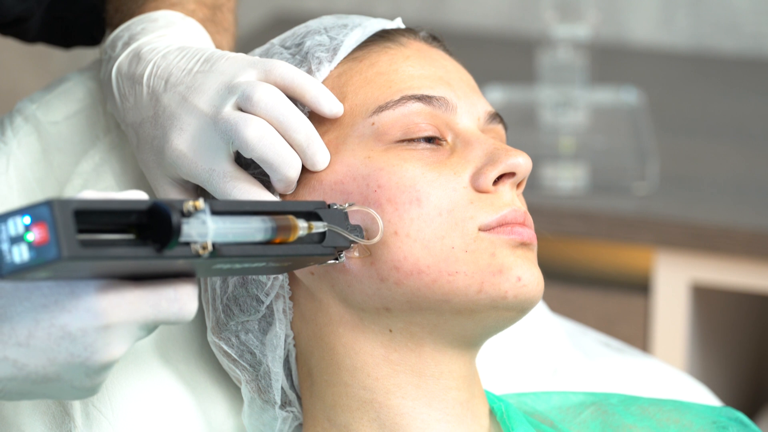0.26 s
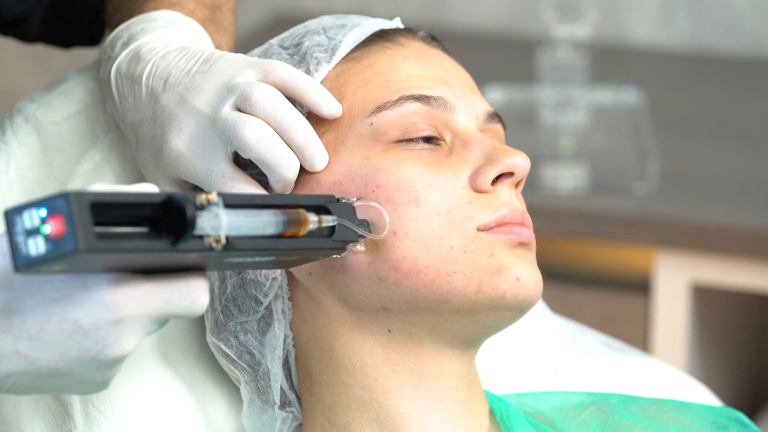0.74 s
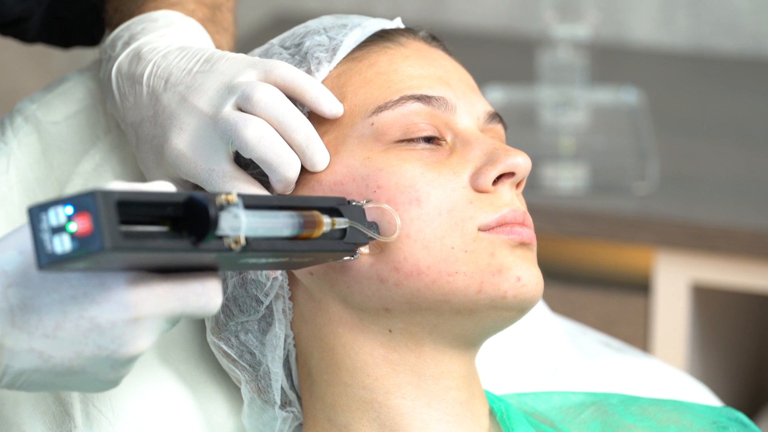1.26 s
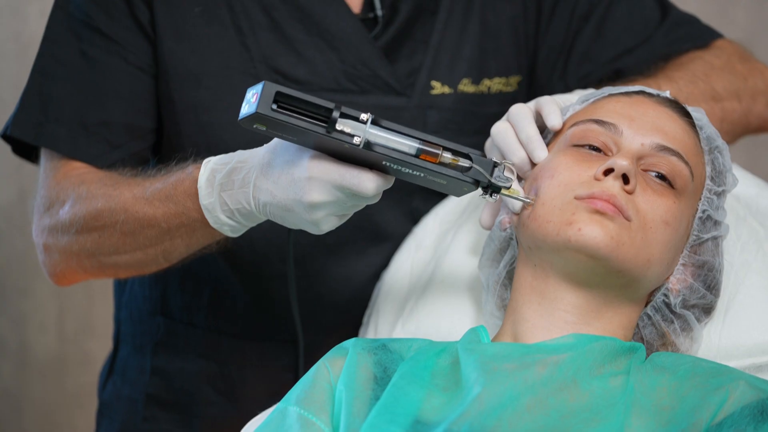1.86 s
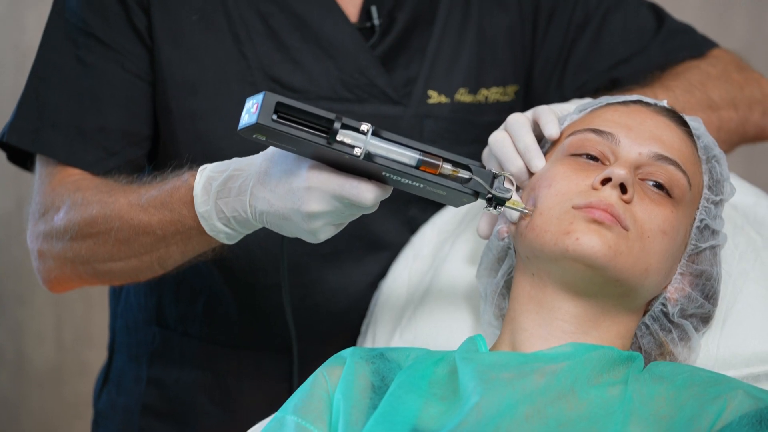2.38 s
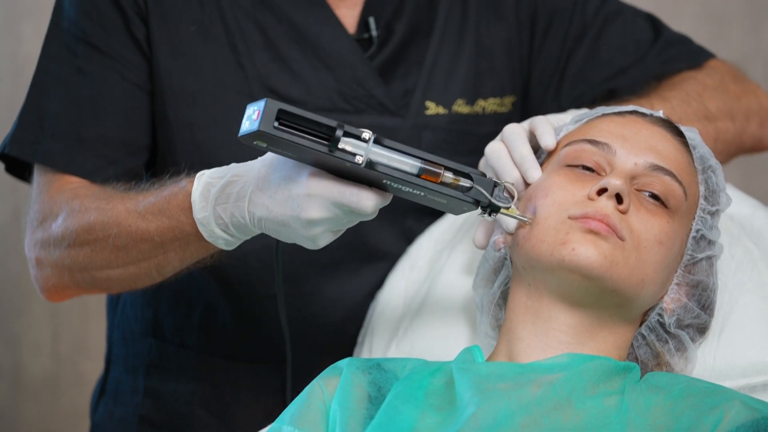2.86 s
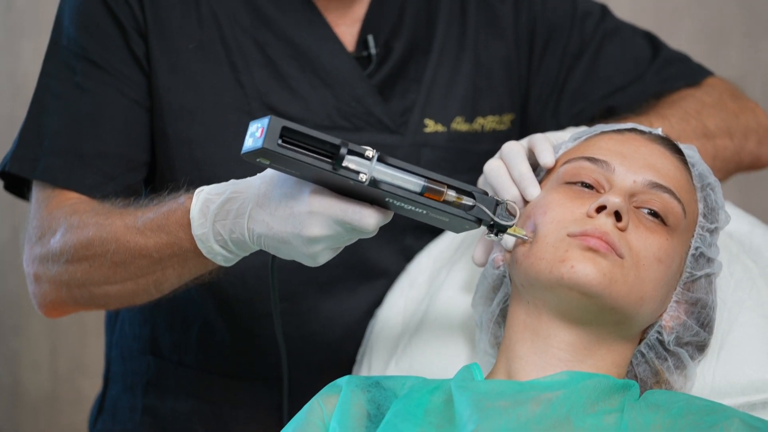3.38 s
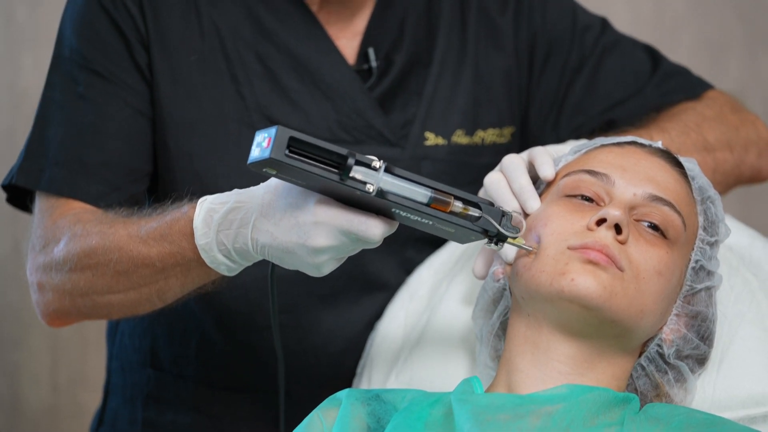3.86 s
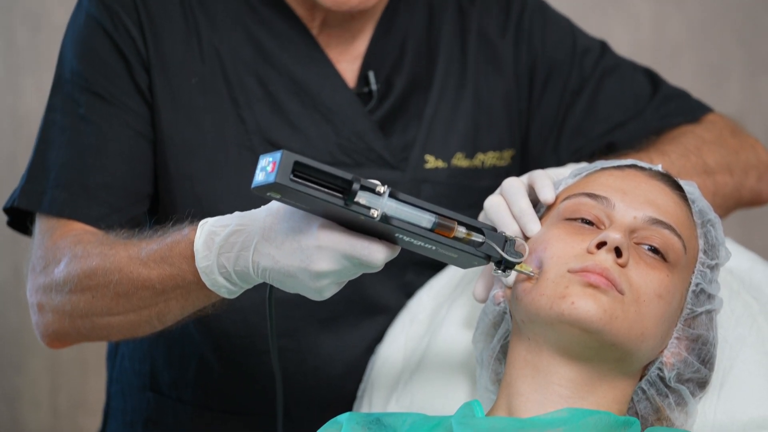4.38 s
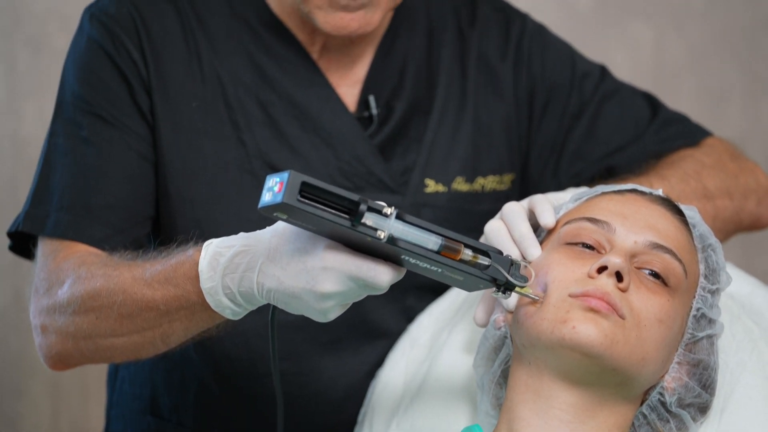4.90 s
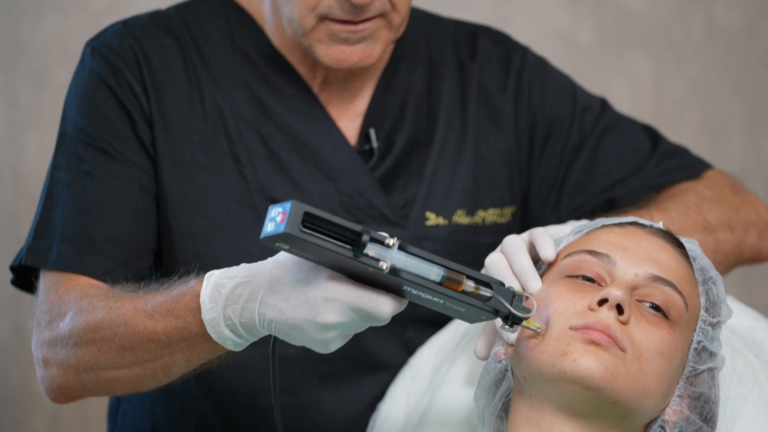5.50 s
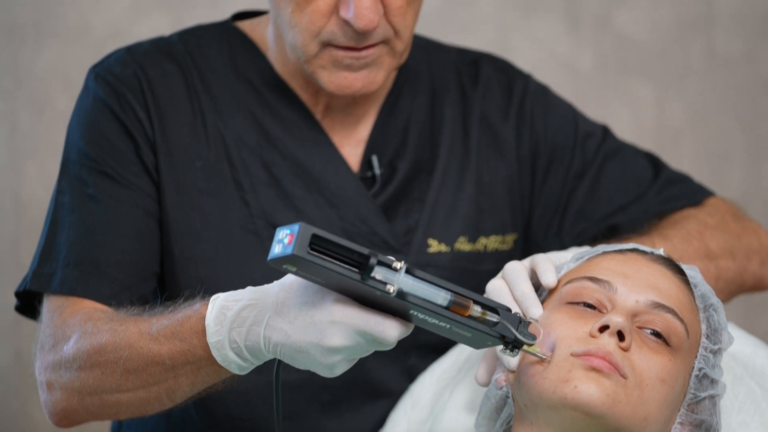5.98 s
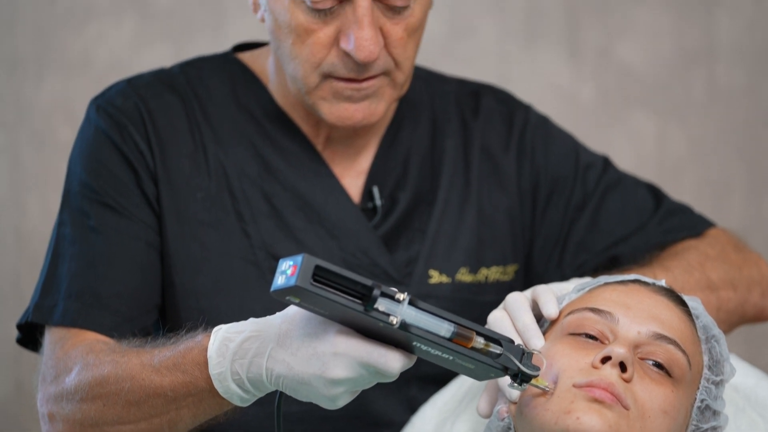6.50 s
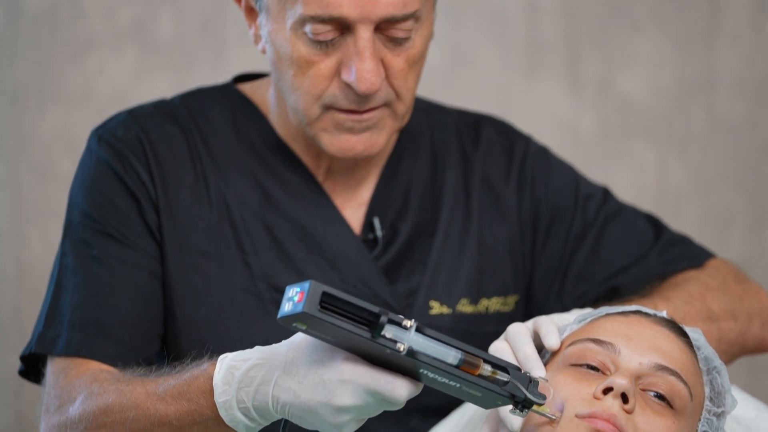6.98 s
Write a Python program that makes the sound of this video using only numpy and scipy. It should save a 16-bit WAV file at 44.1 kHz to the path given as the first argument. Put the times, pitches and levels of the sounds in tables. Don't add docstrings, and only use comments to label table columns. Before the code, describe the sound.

A handheld injector gun fires sharp metallic clacks about twice a second, a thin motor whine and grind following every other one in a quiet room.

```python
import sys
import numpy as np
from scipy import signal
from scipy.fft import rfft, irfft
from scipy.io import wavfile
from scipy.ndimage import uniform_filter1d

SR = 44100
rng = np.random.default_rng(int(sys.argv[2]) if len(sys.argv) > 2 else 0)


def decibels_to_gain(level_db):
    exponent = np.asarray(level_db, float) / 20
    return 10 ** exponent


def wrap_up_sound(samples):
    columns = np.atleast_2d(samples).T
    tamed = np.clip(columns, -1, 1)
    steps = np.round(tamed * 32767).astype(np.int16)
    wavfile.write(sys.argv[1], SR, steps)


N = 319284

# start [s], peak [dB], thud [dB], knock [dB], snap [dB].
FIRE = [(0.086, -10.5, 0.5, -3.5, -2), (1.111, -11, 1.5, -2.5, -1), (2.135, -10.5, 4, -1.5, 0),
        (3.1591, -10, 2, 0.5, -1), (4.184, -10.5, 8.5, 6.5, 1.5), (5.208, -10.5, 7.5, 4.5, 0.5),
        (6.232, -10.5, 2.5, 2.5, -1.5)]
# start [s], peak [dB], thud [dB], knock [dB], snap [dB].
HOME = [(0.609, -10, 6.5, 12.5, 11), (1.633, -9, -5.5, 8, 5.5), (2.656, -9, -0.5, 6, 0),
        (3.682, -9, -6, 0, -4), (4.706, -9, -3, 2.5, -1), (5.731, -9.5, -1, 4.5, 3),
        (6.755, -10, 4, 9.5, 5.5)]
LOW_CUT_HZ = 455
STALL_S = 0.4


def evened(x):
    return x / np.sqrt(np.mean(x ** 2) + 1e-20)


def read(points, hz):
    f, value = np.transpose(points)
    return np.interp(np.log(hz + 1), np.log(f + 1), value)


def add(mix, s, sound):
    part = mix[round(s * SR):][:len(sound)]
    part += sound[:len(part)]


def bump(t, middle, width):
    return np.exp(-.5 * ((t - middle) / width) ** 2)


def coloured(points, size):
    gain = decibels_to_gain(read(points, np.fft.rfftfreq(size, 1 / SR)))
    return evened(irfft(rfft(rng.standard_normal(size)) * gain, size))


def air():
    # frequency [Hz], level [dB per Hz].
    duct = [(35, -22.5), (50, -12.5), (60, -3), (70, -6), (95, -9.5), (125, -16.5), (230, -27),
            (320, -14.5), (420, -30.5), (500, -53.5)]
    # middle [s], width [s], level [dB].
    shifts = [(.11, 0.045, -55), (.37, 0.087, -60), (.83, 0.036, -74), (1.68, .05, -72), (1.98, 0.073, -64),
              (2.48, .07, -69), (2.8, 0.078, -58), (3.36, 0.047, -66.5), (3.649, 0.094, -60.5),
              (4.231, 0.033, -74), (4.6, 0.068, -56), (4.86, .05, -64.5), (6.0, 0.024, -72),
              (6.351, 0.033, -71), (7.1, 0.04, -56)]
    duct_db, rest_db = -87.5, -99.5
    t = np.arange(N) / SR
    shifting = decibels_to_gain(rest_db) + sum(decibels_to_gain(db) * bump(t, s, width) for s, width, db in shifts)
    cloth = [(5, -9.5), (17, -5.5), (28, -21.5), (40, -36), (54, -21), (70, -45.5), (100, -70.0)]
    rumble = coloured(cloth, size=N) * shifting
    lumps_db = 9.0 * coloured([(1, 5.0), (6, -2.5), (12, -20), (40, -72)], size=N)
    return decibels_to_gain(duct_db - 4.0 + lumps_db) * coloured(duct, size=N) + rumble


def tint(thud_db, knock_db, snap_db, edge_db=0):
    return [(600, thud_db), (1700, knock_db), (4800, snap_db), (11000, snap_db + edge_db)]


def blow(body, colour, contact, crack_s=.0012, fresh=.5, soft_hz=19000):
    t = np.arange(1600) / SR
    share = np.clip(fresh, 0, 1)
    rough = np.sqrt(1 - share ** 2) * contact + share * rng.standard_normal(len(t))
    force = rough * np.exp(-t / crack_s) * (1 - np.exp(-t / .0002))
    z = rfft(force)
    force = irfft(z / uniform_filter1d(abs(z), size=9)) * np.exp(-t / (4 * crack_s))
    force = signal.lfilter(*signal.butter(2, soft_hz, fs=SR), force)
    ring = np.zeros(len(t))
    for hz, width, db in body:
        decay = width * np.exp(-np.pi * width * t)
        ring += decibels_to_gain(db + read(colour, hz)) * decay * np.sin(2 * np.pi * hz * t)
    sound = signal.fftconvolve(force, ring)[:len(t)]
    return sound / abs(sound).max()


def springs(size):
    # centre [Hz], width [Hz], level under the blow [dB], t60 [s].
    clusters = [(3394, 170, -30.5, 0.43), (3430, 300, -28, 0.2), (2664, 720, -24.5, 0.097),
                (710, 170, -28, 0.21), (510, 100, -40.5, 0.11)]
    t, hz = np.arange(size) / SR, np.fft.rfftfreq(size, 1 / SR)
    shake = rfft(rng.standard_normal((len(clusters), size)))
    out = np.zeros(size)
    for (centre_hz, width, db, t60), z in zip(clusters, shake):
        resonance = 1 + (2 * (hz - centre_hz) / width) ** 2
        out += decibels_to_gain(db - 60 * t / t60) * evened(irfft(z / resonance, size))
    return out * np.clip(t / 0.0016, 0, 1)


def solenoid():
    # frequency [Hz], width [Hz], level [dB].
    fire_body = [(574, 88, 6), (704, 70, -3.5), (1536, 83, 1), (1833, 250, 8.5), (2300, 140, -8.5),
                 (3300, 200, 1), (4450, 230, 3.5), (5220, 200, 0), (6600, 180, -31), (8320, 390, -30.5),
                 (9830, 660, -17), (11000, 550, -20.5), (12600, 300, -32.5)]
    # frequency [Hz], width [Hz], level [dB].
    home_body = [(590, 200, 10.5), (960, 94, 1), (1742, 287, 4.5), (2610, 970, -0.5), (3360, 170, -13),
                 (4020, 730, -1.5), (5126, 150, 2.5), (5655, 250, 0), (7300, 130, -29), (8900, 1200, -16),
                 (9970, 130, -25), (9900, 1500, -23), (11500, 770, -17), (13580, 630, -48)]
    # frequency [Hz], width [Hz], level [dB].
    crack = [(4870, 330, -1.5), (2583, 1900, -5.5), (11490, 2100, -17)]
    # time from the blow [s], level [dB], dullness [dB].
    rattle = [
        (-.022, -35, -20),
        (-.0112, -25.5, -12),
        (-.0075, -20, 0),
        (-.0035, -15, 0),
    ]
    # time from the blow [s], level over the bounce level [dB].
    bounces = [
        (0.0098, 4),
        (0.0172, -2.5),
        (0.0222, -14),
        (0.029, -25.5),
    ]
    lead_in_db, bounce_db = -26, -7
    slam_s, land_s, touch_s, slide_s = .0017, .0023, .0008, .0025
    out = np.zeros(N)
    forward, back = rng.standard_normal((2, 1600))
    plain = tint(0, 0, 0)
    for s, db, *colour in FIRE:
        lead_in = blow(fire_body, tint(0, 0, -13, -4.5), back, crack_s=0.023, fresh=0.98, soft_hz=2500)
        add(out, s - .006, decibels_to_gain(db + lead_in_db) * lead_in)
        add(out, s, decibels_to_gain(db) * blow(fire_body, tint(*colour), forward, crack_s=slam_s, fresh=0.049))
        steel = blow(crack, plain, back, crack_s=touch_s, fresh=0.11, soft_hz=7360)
        add(out, s, decibels_to_gain(db + colour[-1] - 0.5) * steel)
        add(out, s, decibels_to_gain(db) * springs(size=SR // 2))
    for s, db, *colour in HOME:
        for lag, under_db, dull_db in rattle:
            tick = blow(home_body, tint(-8, 0, dull_db, -4.5), forward, crack_s=slide_s, fresh=0.6, soft_hz=3430)
            add(out, s + lag, decibels_to_gain(db + under_db) * tick)
        add(out, s, decibels_to_gain(db) * blow(home_body, tint(*colour), back, crack_s=land_s, fresh=0.37))
        steel = blow(crack, plain, forward, crack_s=touch_s, fresh=0.91, soft_hz=10800)
        add(out, s, decibels_to_gain(db + colour[-1] - 7.5) * steel)
        for lag, under_db in bounces:
            bounce = blow(home_body, tint(*colour), back, crack_s=land_s, fresh=0.57, soft_hz=12100)
            add(out, s + lag, decibels_to_gain(db + bounce_db + under_db) * bounce)
    return out


def thumps():
    # frequency [Hz], level [dB per Hz].
    couch = [(60, -29), (100, -17), (160, -5), (250, -1), (320, 13), (420, -27.5), (550, -39)]
    out, t = np.zeros(N), np.arange(SR // 2) / SR
    for events, under_db, t60 in ((FIRE, -48, .45), (HOME, -52, .35)):
        for s, db, *_ in events:
            fall = decibels_to_gain(db + under_db - 60 * t / t60)
            add(out, s, fall * coloured(couch, size=len(t)) * np.clip(t / 0.00092, 0, 1))
    return out


def whine():
    # first, second, third harmonic [dB], dip [dB], dip width [s].
    strokes = [(-48.5, -61, -60.5, -4, 0.029), (-45, -62, -60, -3.5, 0.017), (-47, -63.5, -64.5, -4, 0.011),
               (-45.5, -61.5, -65.5, -28, 0.027), (-45.5, -61, -65, -5, 0.021),
               (-49, -60.5, -65, -13, 0.014), (-46, -60, -64, -10, 0.024)]
    # harmonic of the chopping rate [number], level relative to the third [dB].
    upper_whine = [(4, -22.5), (5, -24), (6, -31), (7, -38.5)]
    # time from the blow [s], width [s], level [dB].
    loads = [(.1, .018, -2), (.155, .02, -6), (.236, .025, 0), (.305, .022, -4), (.385, .022, -4)]
    chop_hz, coil_off_s, even_rest_db = 1917.5, .5003, -18
    spin_up_db, spin_up_s = -18, 0.05
    dip_s = .295
    third_sag_db_per_s, wander_db = -6, 3.5
    out, t = np.zeros(N), np.arange(SR * 3 // 4) / SR
    after = t - coil_off_s
    lingering = decibels_to_gain(-14 - 60 * after.clip(0) / .2)
    gate = np.clip(t / .06, 0, 1) * np.maximum(np.clip(-after / .001, 0, 1), lingering)
    turn = 2 * np.pi * chop_hz * t
    turning = np.clip((STALL_S - t) / 0.016, 0, 1)
    load = decibels_to_gain(even_rest_db) + sum(decibels_to_gain(db) * bump(t, at, width) for at, width, db in loads)
    upper = sum(decibels_to_gain(db) * np.sin(k * turn) for k, db in upper_whine)
    for (s, *_), (first_db, second_db, third_db, dip_db, dip_width) in zip(FIRE, strokes):
        slow = uniform_filter1d(rng.standard_normal((3, len(t))), size=700)
        wander = wander_db * turning * evened(uniform_filter1d(slow, size=700))
        climb_db = spin_up_db * np.exp(-t / spin_up_s)
        first = decibels_to_gain(first_db + climb_db + dip_db * bump(t, dip_s, dip_width) + .6 * wander[0])
        second = decibels_to_gain(second_db + wander[1]) * load
        third = decibels_to_gain(third_db + third_sag_db_per_s * (t - dip_s) + wander[2])
        tones = first * np.sin(turn) + second * np.sin(2 * turn) + third * (np.sin(3 * turn) + upper)
        add(out, s, np.sqrt(2) * gate * tones)
    return out


def grind_db(t):
    # time from the blow [s], width [s], level over the grind [dB].
    binds = [
        (0.095, 0.024, 12.5),
        (.16, 0.023, 5),
        (.207, 0.012, 9),
        (0.259, 0.009, 5.5),
        (.292, 0.022, 4.5),
        (.39, .01, -1.5),
    ]
    binds_db = sum(db * bump(t, at, width) for at, width, db in binds)
    rise_db = -26 * np.exp(-t / 0.086)
    sag_db = -41.5 * t
    stop_db = -250 * (t - STALL_S).clip(0)
    return -45.5 + rise_db + sag_db + binds_db + stop_db


def tooth(snap_db):
    # frequency [Hz], width [Hz], level [dB].
    gear_case = [(1510, 89, 4.5), (1000, 200, -10.5), (5700, 190, -3), (2500, 130, -10), (4130, 260, -7),
                 (9000, 2700, -34)]
    return blow(gear_case, tint(0, 0, snap_db), np.zeros(1600), crack_s=0.005, fresh=.99, soft_hz=11000)


def motor():
    # frequency [Hz], level [dB per Hz].
    gears = [(150, -62), (250, -29), (458, -13.5), (809, -20.5), (1790, -7.5), (1920, -6), (2020, -11),
             (2530, -16), (4790, -16), (5890, -15.5), (7130, -26.5), (11200, -30.5), (14500, -46.5)]
    # from [s], to [s], from [Hz], to [Hz], level [dB].
    glides = [(.055, .095, 1400, 1575, -47), (0.147, .215, 920, 1472, -52), (0.128, .192, 1503, 1740, -50),
              (0.207, .242, 1810, 2390, -51), (0.217, .264, 1845, 1000, -54), (0.277, .33, 2010, 1460, -51),
              (.295, .333, 1910, 2500, -60), (.345, .402, 1484, 2277, -50), (.355, .401, 2120, 1645, -53.5)]
    # time from the blow [s], level under the blow [dB], snap [dB].
    slack = [(0.153, -24.5, -12.5), (.26, -37.5, -19.5), (0.286, -35.5, -12), (.34, -37.5, -0.5),
             (.365, -47, -6.5)]
    # start [s], peak [dB], snap [dB].
    take_up = [(0.175, -26, -0.5), (0.287, -31.5, 2.5), (1.203, -24.5, 0), (1.312, -30, 0),
               (2.228, -25.5, -3), (2.335, -31.5, -4), (3.254, -27, -1), (3.359, -31.5, -2.5),
               (3.446, -51.5, 4.5), (4.278, -28, -5), (4.384, -32, -2.5), (4.547, -42, 5),
               (5.302, -27.5, 0), (5.409, -34, -11), (6.326, -29.5, 1.5), (6.431, -34, -17.5)]
    waver_hz, flutter_db = 35, 2.5
    out, t = np.zeros(N), np.arange(SR // 2) / SR
    for s, db, *_ in FIRE:
        flicker_db = 2.0 * evened(uniform_filter1d(rng.standard_normal(len(t)), 200))
        add(out, s, coloured(gears, size=len(t)) * decibels_to_gain(grind_db(t) + flicker_db))
        for start, end, from_hz, to_hz, glide_db in glides:
            u = np.arange(0, end - start, 1 / SR) / (end - start)
            waver, flutter = evened(uniform_filter1d(rng.standard_normal((2, 4410)), 110))[:, :len(u)]
            hz = from_hz + (to_hz - from_hz) * u ** 0.7 + waver_hz * waver
            tone = np.sin(np.pi * u) ** .5 * np.sin(2 * np.pi * np.cumsum(hz) / SR)
            add(out, s + start, decibels_to_gain(glide_db + flutter_db * flutter) * tone)
        for lag, under_db, snap_db in slack:
            late, loud = rng.standard_normal(2)
            add(out, s + lag + 0.00067 * late, decibels_to_gain(db + under_db + 1.8 * loud) * tooth(snap_db))
    for s, db, snap_db in take_up:
        add(out, s - .002, decibels_to_gain(db - 1.5) * tooth(snap_db))
    return out


def rustles():
    # start [s], length [s].
    times = [(.995, .11), (2.028, .05), (2.083, .05), (2.555, .1), (.48, .1), (1.87, .1), (6.02, .1),
             (1.025, .075), (.14, .14), (1.33, .1), (1.78, .1), (2.25, .25), (2.88, .1), (3.08, .1),
             (5.3, .14), (4.3, .15)]
    # level [dB], centre [Hz], width [octaves].
    scuffs = [(-70, 1330, 0.68), (-61.5, 1400, 1.3), (-55.5, 1440, 2.1), (-52.5, 830, 1.16),
              (-67.5, 1300, 1), (-69, 980, 1.4), (-78, 680, 1.3), (-63, 275, 0.15), (-75, 148, 0.32),
              (-78, 144, 0.62), (-82, 150, 0.2), (-72.5, 180, 0.46), (-81, 142, 0.28), (-72, 138, .45),
              (-73.5, 220, 0.63), (-71.5, 324, 0.34)]
    out = np.zeros(N)
    for (s, length), (db, hz, octaves) in zip(times, scuffs):
        u = np.arange(0, length, 1 / SR) / length
        sides = (-2, -1, -.5, 0, .5, 1, 2, 4)
        colour = [(hz * 2 ** (octaves * side), -min(12 * side ** 2, 60)) for side in sides]
        scuff = coloured(colour, size=SR // 2)[:len(u)]
        add(out, s, decibels_to_gain(db) * scuff * np.clip(u / 0.063, 0, 1) * (1 - u ** 3))
    return out


def radiated(events, colour, lags):
    pulses = np.zeros(N)
    for s, db, *_ in events:
        for lag, under_db in lags:
            pulses[round((s + lag) * SR)] = decibels_to_gain(db + under_db)
    gain = decibels_to_gain(read(colour, np.fft.rfftfreq(1024, 1 / SR)))
    pulse = np.roll(irfft(gain), 512) * np.hanning(1024)
    return signal.oaconvolve(pulses, pulse / np.linalg.norm(pulse), "same")


def room(x):
    # frequency [Hz], t60 [s].
    decay = [(250, 1), (660, 0.83), (1740, 0.5), (4590, 0.58), (12100, 0.49)]
    taps = np.zeros(SR)
    at = np.arange(200, SR - 20, 20)
    taps[at + rng.integers(0, 20, len(at))] = rng.choice([-1., 1.], len(at))
    hz, t, z = signal.stft(taps, SR, nperseg=256)
    fall_db = -60 * t / read(decay, hz)[:, None]
    near, corridor = decibels_to_gain(1.584 * fall_db), decibels_to_gain(-21 + 0.66 * fall_db)
    tail = signal.istft(z * (near + corridor), SR, nperseg=256)[1]
    return signal.fftconvolve(x, tail / np.linalg.norm(tail))[:N]


def scene():
    # frequency [Hz], level [dB per Hz].
    hiss_colour = [(260, -19.5), (450, -5.5), (520, -1.5), (657, -6), (759, -10), (865, -8.5), (1230, -10),
                   (8110, -26), (13700, -30.5), (14500, -30.5)]
    # frequency [Hz], level [dB per Hz].
    fire_echo = [(180, -44.5), (300, 0.5), (744, -12.5), (1620, -1.5), (1750, -5.5), (2400, -8.5),
                 (3400, -3), (3810, -13), (4800, -6.5), (7140, -19.5), (11100, -23), (14000, -33),
                 (15500, -42.5)]
    # frequency [Hz], level [dB per Hz].
    home_echo = [(180, -55.5), (300, 1.5), (417, -22.5), (492, 1), (685, -5.5), (731, -6.5), (968, -1),
                 (1120, -6.5), (1730, 5), (2170, -2), (5570, -8.5), (12700, -21.5), (15500, -35)]
    hum, hiss = motor(), decibels_to_gain(-70) * coloured(hiss_colour, size=N)
    echo = room(decibels_to_gain(-9.5) * hum)
    for k in range(3):
        fired = radiated(FIRE[k::3], fire_echo, [(.002, 2.2), (.008, 1.7)])
        landed = radiated(HOME[k::3], home_echo, [(.002, 4), (.013, 1.3), (.021, 0.34)])
        echo += room(fired + landed)
    steep = signal.butter(6, LOW_CUT_HZ, "high", fs=SR, output="sos")
    gun = signal.sosfilt(steep, hum + whine() + echo + hiss)
    gun += signal.sosfiltfilt(signal.butter(4, LOW_CUT_HZ, "high", fs=SR, output="sos"), solenoid())
    return (gun + thumps() + rustles() + air())[None]


def roll_off(x):
    return signal.sosfilt(signal.butter(12, 16660, fs=SR, output="sos"), x)


def record(dry):
    shelf = signal.cheby2(10, 17, 14600, "low", fs=SR, output="sos")
    dulled = signal.sosfilt(shelf, dry)
    return roll_off(dulled)


dry = scene()
out = record(dry)
wrap_up_sound(out)
```